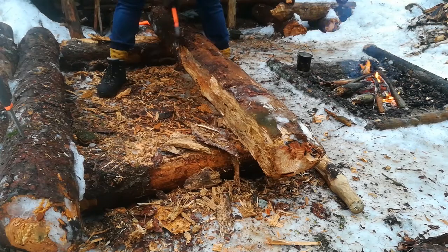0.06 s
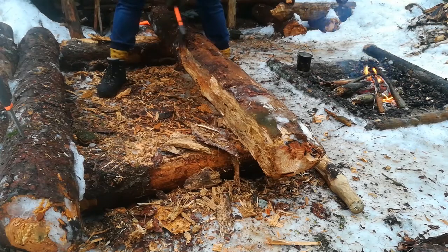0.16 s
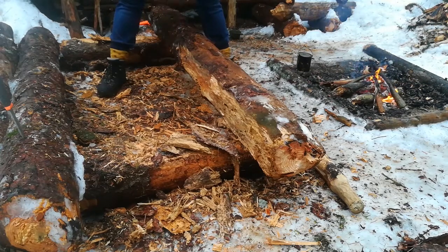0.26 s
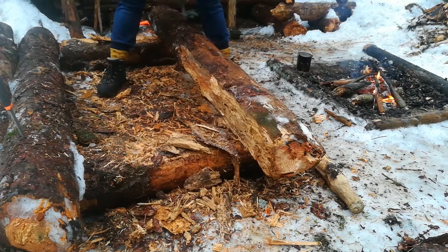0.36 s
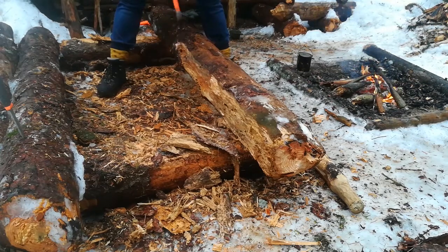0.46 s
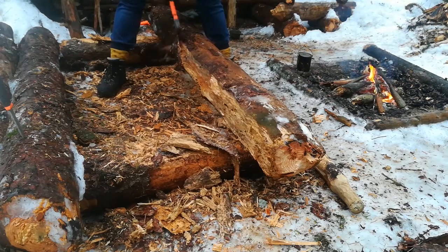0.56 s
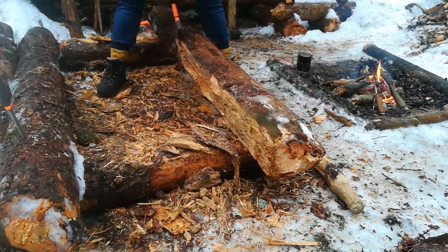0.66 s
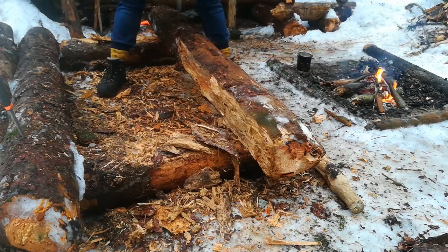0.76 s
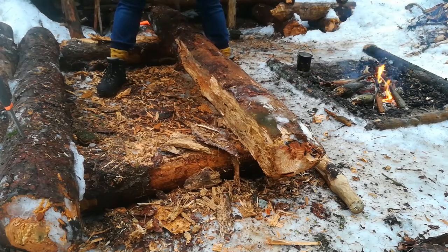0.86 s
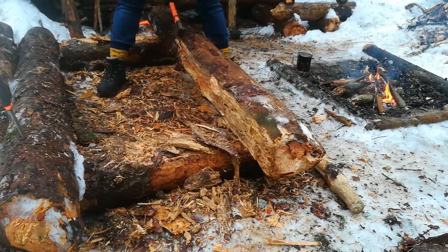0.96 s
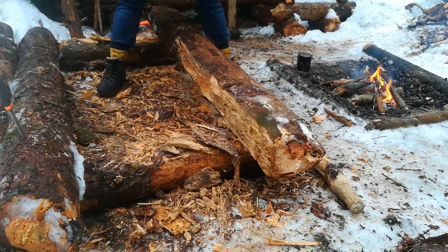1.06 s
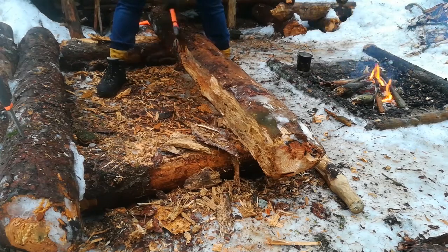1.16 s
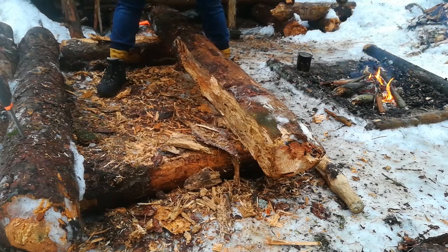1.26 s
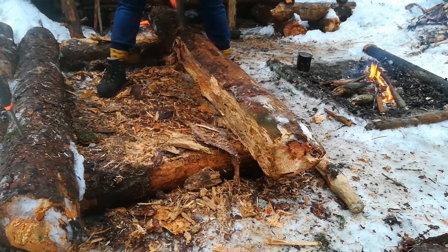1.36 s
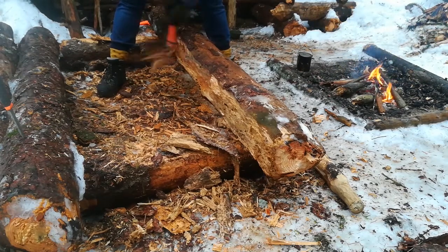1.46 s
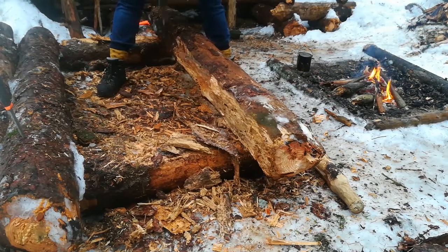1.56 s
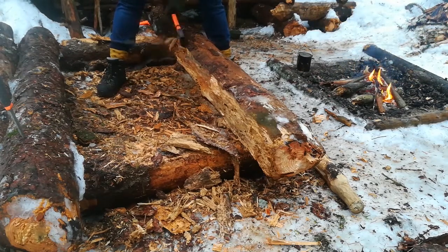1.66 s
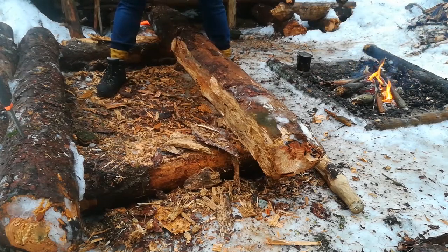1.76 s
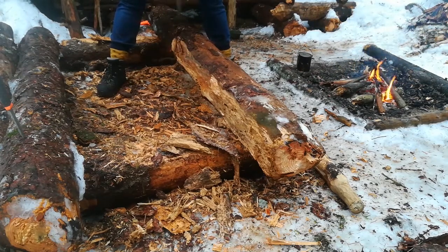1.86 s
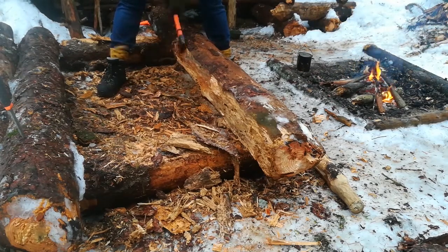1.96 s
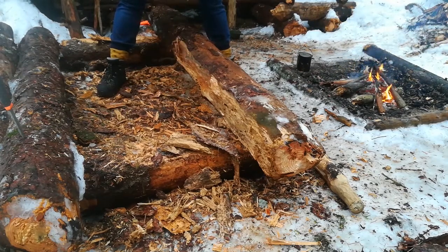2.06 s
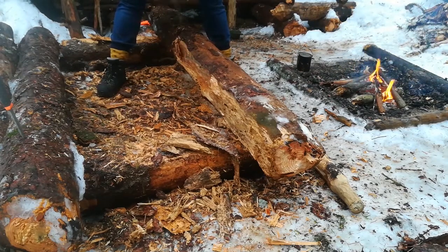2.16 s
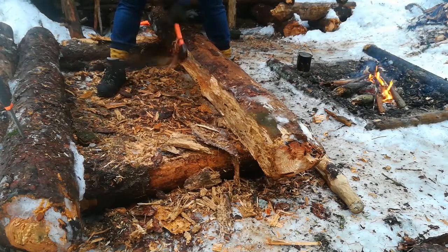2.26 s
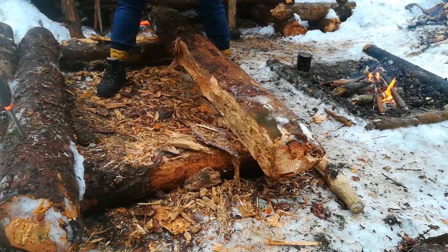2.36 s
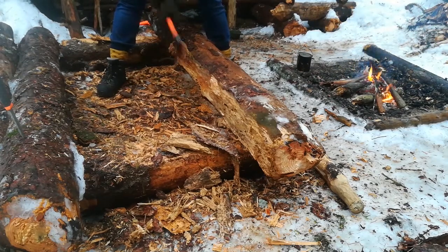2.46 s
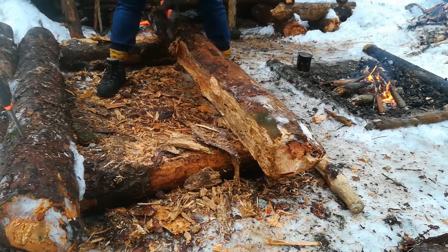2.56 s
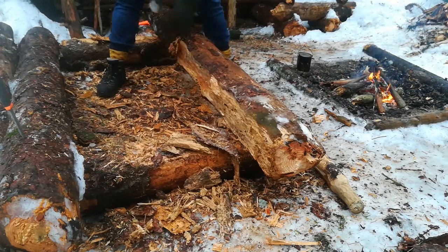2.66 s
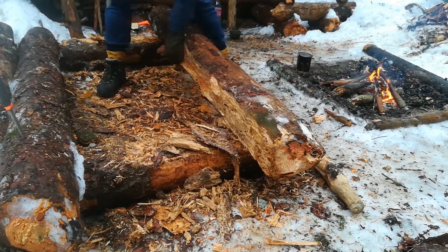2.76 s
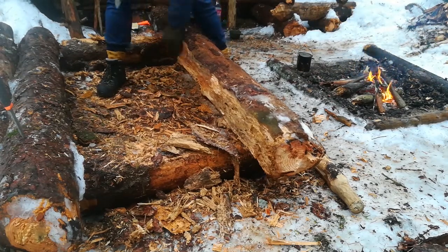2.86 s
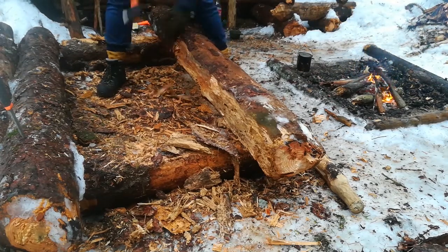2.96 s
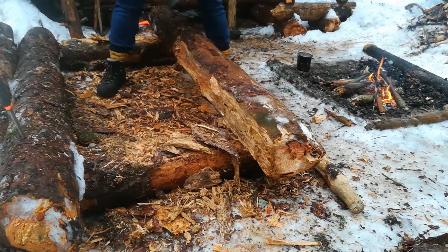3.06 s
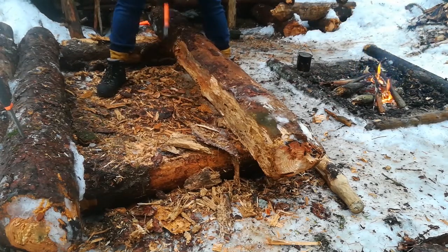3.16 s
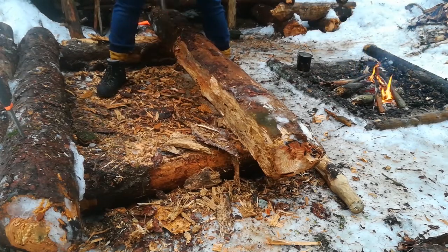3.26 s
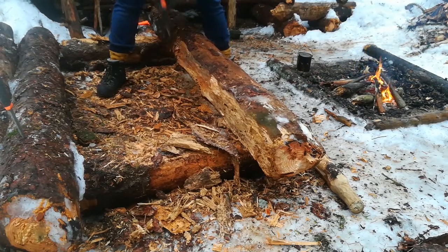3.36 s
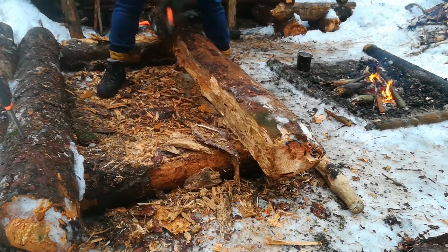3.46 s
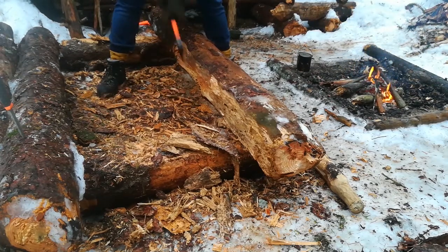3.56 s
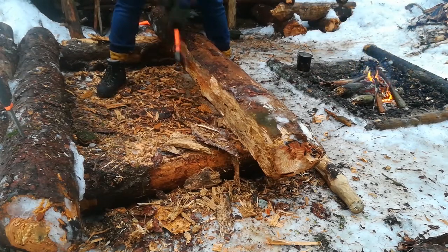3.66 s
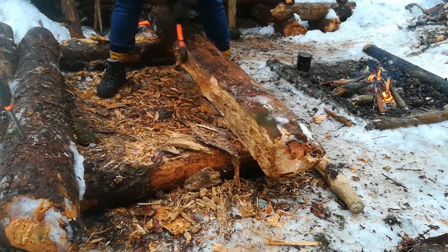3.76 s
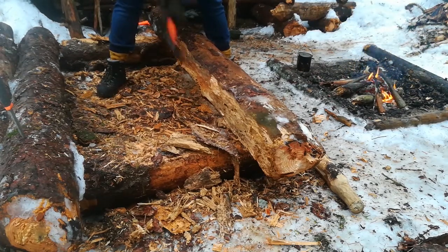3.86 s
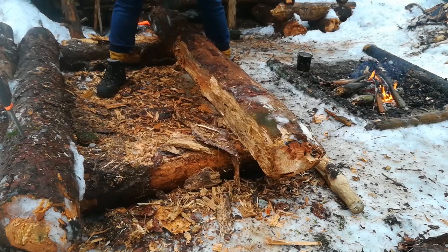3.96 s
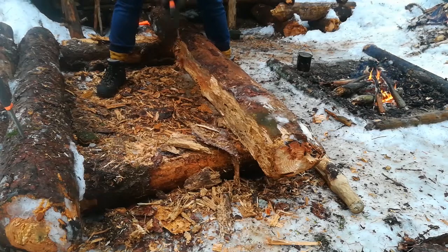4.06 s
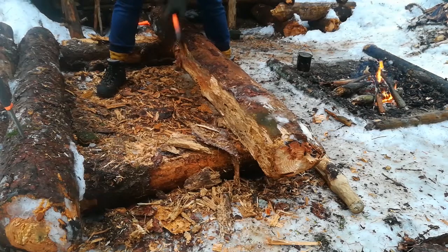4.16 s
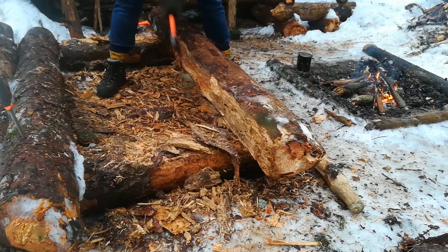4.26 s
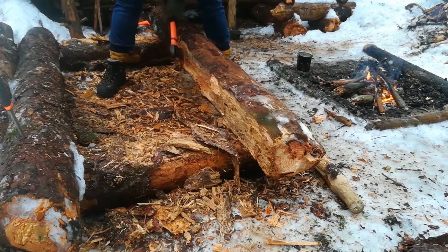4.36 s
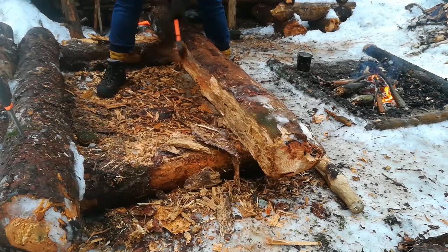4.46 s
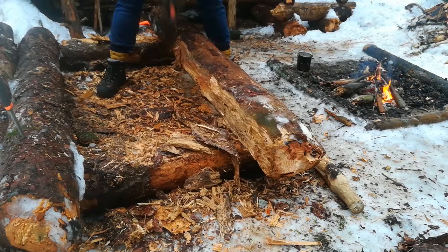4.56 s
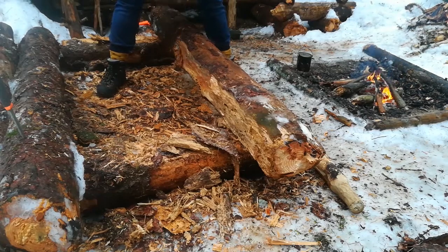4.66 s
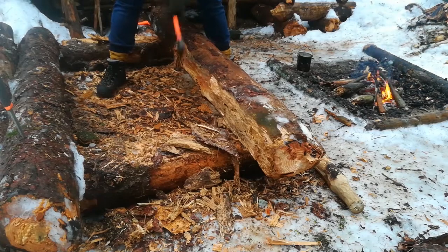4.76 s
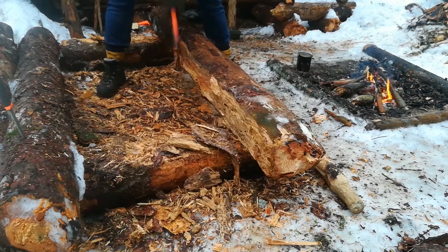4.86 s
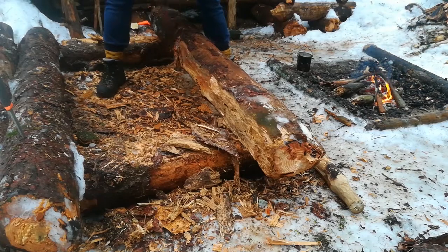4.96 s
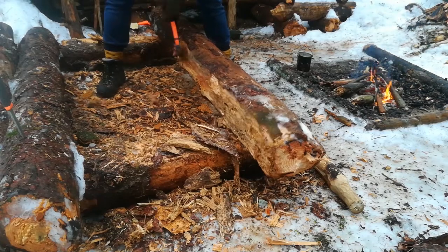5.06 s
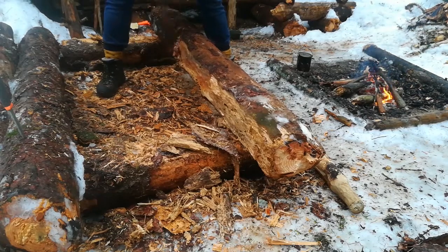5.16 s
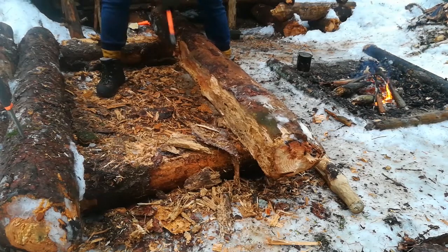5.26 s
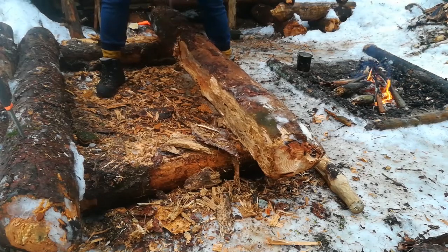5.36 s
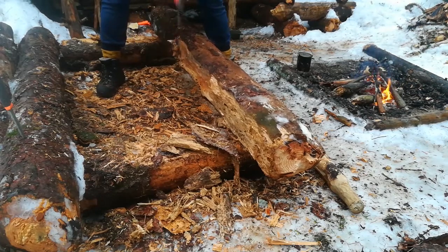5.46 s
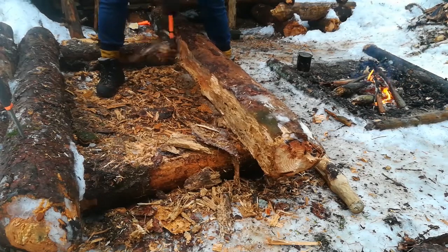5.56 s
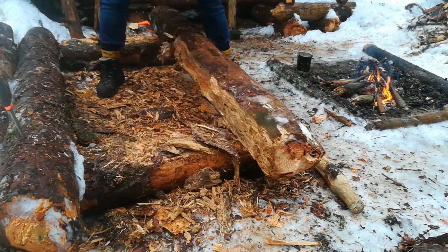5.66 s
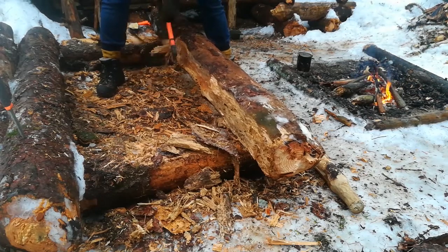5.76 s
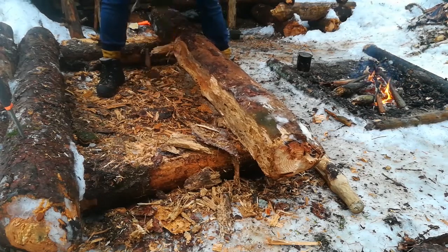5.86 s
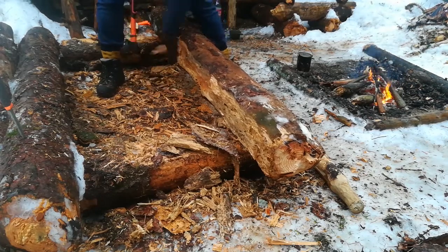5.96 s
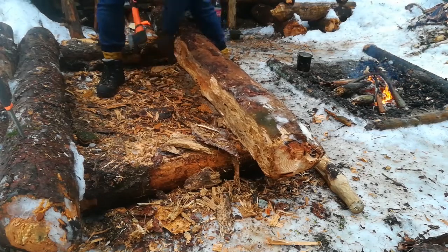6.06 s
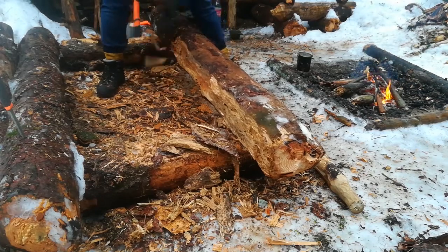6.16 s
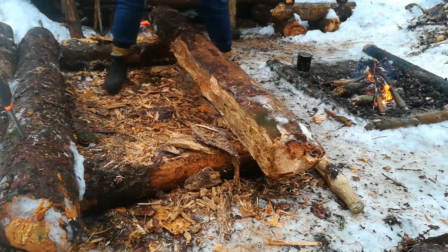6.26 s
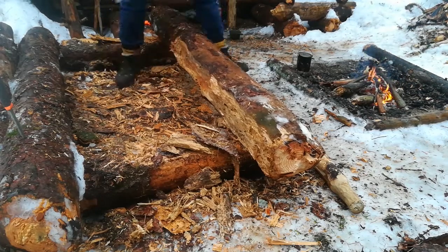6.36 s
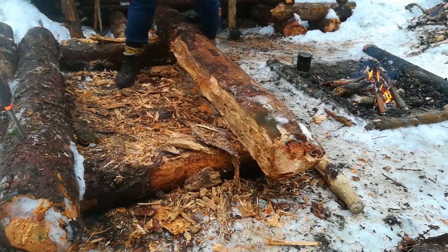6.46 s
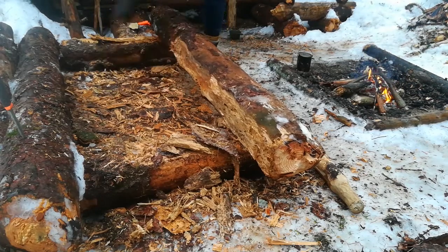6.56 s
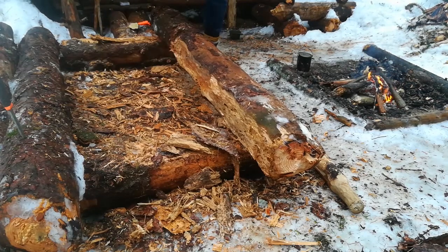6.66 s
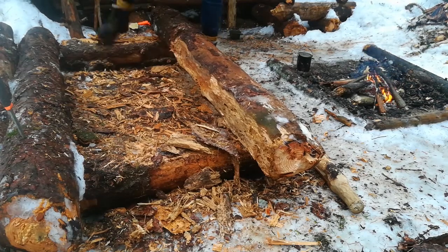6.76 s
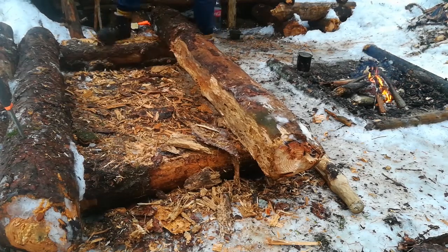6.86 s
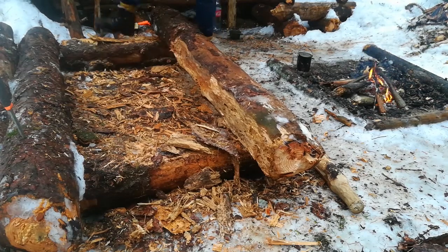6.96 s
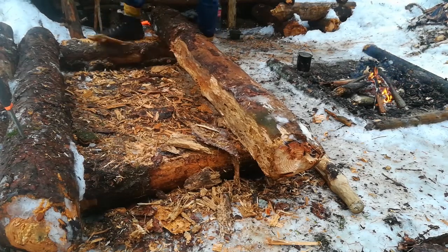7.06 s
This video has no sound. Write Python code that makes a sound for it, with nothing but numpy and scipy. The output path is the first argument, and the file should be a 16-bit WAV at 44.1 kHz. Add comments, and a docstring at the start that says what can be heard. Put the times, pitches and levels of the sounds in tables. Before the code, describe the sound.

Sharp, very short wood cracks with woody knocks, low muted thumps and bright chip spray, several blows a second. A soft burst leads to stronger chops, a brief break with bumps and scraping debris, then a long even run that gets louder. It stops abruptly, leaving faint fire-and-forest hiss, sparse ticks and a small rustle. Dry open air, fairly close stereo pickup, little deep bass.

```python
"""A snowy forest camp: an axe hews a pine log in quick bursts, a few metres from a small two-port microphone.
Each blow tears fibres in a crack of filtered noise a few ms long, knocks and thumps the log as decaying sines,
and throws chips as grainy noise. Short snaps fall within the blows and apart from them, with dull bumps and
rustles. Beneath lie a low flutter, a faint hiss of fire and forest from the left, and a few thin tones that
swell and fade."""
import sys
import numpy as np
from scipy import signal
from scipy.fft import rfft, irfft
from scipy.io import wavfile
from scipy.ndimage import uniform_filter1d

SR = 44100
rng = np.random.default_rng(int(sys.argv[2]) if len(sys.argv) > 2 else 0)


def bounce(signal):
    """Save signal as a 16-bit WAV file at the path given by the first command-line argument."""
    frames = np.transpose(np.atleast_2d(signal))
    limited = np.clip(frames, -1, 1)
    pcm = np.round(limited * 32767).astype(np.int16)
    wavfile.write(sys.argv[1], SR, pcm)


N = 313551

# Longest modes of the log, a loose cluster. Each row: pitch in Hz, level in dB, time to fall 60 dB in s.
LOG_RING = [(451.6,-2.5,0.08),(522.5,-7.5,0.045),(388.6,-7.5,0.047)]


def undb(db):
    """Decibels to gain."""
    return 10 ** (np.asarray(db) / 20)


def band(x, hz, width):
    """Two-pole resonance, gain 1 at the centre, width in Hz."""
    return signal.lfilter(*signal.iirpeak(min(hz, .45 * SR), hz / width, SR), x)


def peak(x, db):
    """Scale to a peak level in dB."""
    return x * undb(db) / np.abs(x).max()


def shape(x, points):
    """Colour the spectrum by (Hz, dB) points, joined along log frequency."""
    hz, db = np.transpose(points)
    log_hz = np.log(np.fft.rfftfreq(x.shape[-1], 1 / SR) + 1)
    return irfft(rfft(x) * undb(np.interp(log_hz, np.log(hz), db)), x.shape[-1])


def add(out, x, s):
    """Mix x into out from s seconds on."""
    i = int(s * SR)
    out[..., i:i + x.shape[-1]] += x[..., :N - i]


def grit(size, spread_db, alike):
    """Noise of uneven grains at two ports, more alike as alike nears 1."""
    mid, side = rng.standard_normal((2, size)) * undb(spread_db * rng.exponential(size=size))
    a = np.clip(alike, 0, 1)
    return np.sqrt(1 + a) * mid + np.sqrt(1 - a) * side * np.array([[1], [-1]])


def mode(t, hz, t60):
    """A struck mode: a sine that falls 60 dB in t60 seconds."""
    return np.sin(2 * np.pi * hz * t) * np.exp(-np.log(1000) * t / t60)


def push(x, ms):
    """A softer contact smears the blow over a few ms."""
    return signal.lfilter(np.hanning(int(ms * SR / 1000) + 3), 1, x)


def bright(grains):
    """Dry wood debris sounds in two humps, near 5 and 13 kHz."""
    low_hump = band(band(grains, 4730.0, 5700.0), 5000.0, 5384.0)
    high_hump = band(band(grains, 13000., 3970.0), 12800.0, 5000.0)
    return low_hump + 0.84 * high_hump


def hiss():
    """A steady hiss from the left reaches the right port later; in the treble each port hears its own."""
    # Spectrum of the hiss. Each row: frequency in Hz, relative level in dB.
    colour = [(25, -32), (160, -11.5), (280, -3.5), (450, -9), (700, -13.5), (1500, -13), (2400, -13),
              (3400, -10), (9000, -26.5), (11000, -27), (14000, -27), (15700, -31)]
    lag = 8  # samples
    common, *own = rng.standard_normal((3, N))
    common = shape(common, [(2500, 4.5), (6000, -9.0)])
    own = shape(np.array(own), [(300, -44), (1200, -2.5), (5000, 5)])
    both = shape(np.array([common, np.roll(common, lag)]) + own, colour)
    return both / both.std() * undb(-60.5)


def flutter():
    """Many weak bumps at random, softened by their contact, over a low rumble."""
    # Course of the flutter. Each row: time in seconds, rms level in dB.
    course = [(0,-61),(.5,-64),(1.05,-52),(1.6,-59),(2,-55),(2.3,-62.5),(2.85,-59),(3.15,-69),(4.1,-63),(4.9,-67.5),(5.25,-62.5),(5.8,-70),(7.11,-74.5)]
    kicks = (rng.random(N) < 110 / SR) * rng.standard_normal(N)  # about 110 a second
    rumble = band(band(rng.standard_normal(N), 62.0, 90.), 70., 120.)
    low = band(push(kicks, 2.07), 253.0, 380.0) + 4.1 * rumble
    return low / low.std() * undb(np.interp(np.arange(N) / SR, *np.transpose(course)))


def crack(t, db, hz, fade):
    """Torn fibres: a burst of grains through wood resonances, with a treble edge that grows with the crack."""
    # Resonances of the crack. Each row: centre in Hz, width in Hz, relative level in dB.
    resonances = [(3380, 140, -15), (3823, 390, -4), (4690, 890, -3), (5650, 600, -7), (7360, 1200, -5.5)]
    # Resonances of the treble edge. Each row: centre in Hz, width in Hz, relative level in dB.
    edge_bands = [(11330, 3400, 8), (13620, 1440, 5.5), (14600, 508, 0)]
    tear = grit(len(t), 3.25, 0.77) * np.minimum(t / 0.00089, 1) * np.exp(-1000 * t / max(fade, .3))
    tear[:, 30] += 4.0  # the edge bites
    body = 0.044 * band(tear, hz, 0.22 * hz)
    for f, width, level in resonances:
        # the place of the cut favours the resonances near its own colour
        favour = level - 1.1 * abs(np.log2(f / hz))
        body = body + undb(favour) * band(tear, f, width) / np.sqrt(width)
    body = band(body, 4100.0, 7100.0)
    body = body - 0.32 * band(body, 2480.0, 896.0)
    edge = sum(undb(level) * band(tear, f, width) / np.sqrt(width) for f, width, level in edge_bands)
    return peak(body, db) + peak(band(edge, 11800.0, 4550.0), -7.5 + 0.73 * db)


def knock(t, db, hz):
    """Short modes of the log, retuned a little each time, driven by the blade in a few quick pushes."""
    # Short modes of the log. Each row: pitch in Hz, level in dB, time to fall 60 dB in s.
    log_modes = [(600,-2.5,0.02),(764,-6.5,.02),(980,-1.5,0.022),(1400,-3,0.018),(1650,-3,0.017),(2100,-10,.011)]
    log = np.zeros(len(t))
    for f, level, t60 in log_modes:
        a, b = rng.standard_normal(2)
        favour = level + 1.23 * a - 10.9 * abs(np.log2(f / hz))
        log += undb(favour) * mode(t, f * (1 + b / 30), t60)
    pushes = (rng.random(400) < .03) * rng.standard_normal(400) * 0.46 * np.exp(-t[:400] / 0.0045)
    pushes[40] += 1  # the main push
    return peak(band(np.convolve(log, pushes)[:len(t)], 1300.0, 2400.0), db)


def chips(t, crack_db):
    """Falling chips: bright fading grains; harder cracks throw more."""
    grains = grit(len(t), 3.67, 0.17) * np.minimum(t / 0.0012, 1) * np.exp(-(t / 0.022) ** 0.89)
    return undb(-44 + 0.86 * crack_db) * bright(grains)


def thump(t, hz, knock_db):
    """The weight of the blow: two low modes, struck again more weakly as the log chatters on its bed."""
    low = mode(t, hz, 0.024) + 0.096 * mode(t, 196.6, 0.065)
    chatter = (rng.random(1200) < .004) * rng.standard_normal(1200) * 0.14 + (t[:1200] == 0)
    low = np.convolve(low, chatter)[:len(t)]
    return peak(band(push(low, 2.35), 309.0, 360.0), -17 + 0.57 * knock_db)


def ring(t):
    """The cluster of long modes; the grip of the bed retunes it each time and makes it waver."""
    steps = np.repeat(rng.standard_normal(len(t) // 250 + 1), 250)
    waver = undb(2.9 * uniform_filter1d(steps, size=200)[:len(t)])
    modes = np.zeros(len(t))
    for f, level, t60 in LOG_RING:
        a, b = rng.standard_normal(2)
        modes += undb(level + 2.5 * a) * mode(t, f * (1 + 0.027 * b), t60)
    return waver * modes


def rattle(t):
    """Loose bark shakes after the blow: a fading band of grains."""
    # One row: centre in Hz, width in Hz, gain in dB beside the ring, fade time constant in s.
    hz, width, db, fade = (749,699,-17.5,0.04)
    return undb(db) * band(grit(len(t), 3.4, 0.87), hz, width) * np.exp(-t / fade)


def axe():
    """Crack and knock come first with the chips; the log takes the weight once the blade has stopped."""
    # Each row: start in seconds, crack peak in dB, crack colour in Hz, knock peak in dB, knock colour in Hz,
    # thump pitch in Hz, crack fade in ms, ring gain in dB.
    blows = [(0.0729,-22,4220,-26,980,318.5,1.4,-39),(0.1927,-31.5,3280,-33,1340,356,2,-49),
             (0.3319,-28.5,3480,-26,1400,344,2.5,-38.5),(0.4449,-25,3230,-35.5,1600,227,1.6,-48),
             (0.5615,-25,6800,-29,1190,480,3.6,-49),(0.6796,-23,3800,-24,1530,404,2.03,-35.5),
             (0.807,-28,4400,-32.5,1070,480,3.8,-42),(0.967,-29,4100,-25,930,397,3.4,-32),
             (1.1687,-14.5,6500,-22.5,1780,370,1.66,-30),(1.3273,-8.5,3130,-25.5,1410,350,1.78,-35.5),
             (1.477,-15.5,5400,-24.5,1450,408,1.94,-35.5),(1.67,-16.5,3240,-23,664,417,1.94,-49),
             (1.8143,-11.5,3630,-20,1410,263,2.1,-37.5),(1.9544,-12,3650,-17,1650,362,2.1,-33.5),
             (2.1167,-16,3280,-22,915,354,2.1,-29.5),(2.266,-11,3150,-26,676,397,1.8,-29),
             (2.431,-18,3300,-25,1000,387,3.13,-38.5),(3.335,-19,3620,-31.5,1440,403,1.9,-32.5),
             (3.4565,-8.5,3470,-31.5,1400,480,1.28,-43),(3.5638,-15.5,3350,-28,1300,324,3.44,-34.5),
             (3.676,-20.5,3100,-32,1440,400,2.2,-39),(3.788,-9.5,5000,-29,1500,458,1.86,-36),
             (3.907,-8,4880,-32.5,1420,464,1.73,-42),(4.0278,-14,3140,-27.5,1660,444,2.14,-43),
             (4.137,-18,5400,-29,1440,423,3.35,-38.5),(4.2521,-19,4400,-24,970,402,3.8,-36.5),
             (4.371,-14.5,3260,-22.5,1110,496,2.44,-34),(4.4961,-16.5,3100,-20,1140,488,1.94,-30.5),
             (4.6104,-14.5,6170,-19,1110,504,2.55,-33),(4.7351,-11.5,3700,-24.5,600,493,1.77,-39),
             (4.8993,-9.5,4690,-18.5,942,463,2.26,-31),(5.0541,-5.5,4760,-20,1590,343,1.56,-30),
             (5.233,-4,4570,-23.5,975,432,1.48,-37),(5.4036,-1.5,4000,-20,1000,466,2.07,-34),
             (5.573,-4.5,4240,-19,977,454,2.16,-30),(5.7414,-2,5580,-24,1060,386,1.95,-35.5)]
    out, t = np.zeros((2, N)), np.arange(6000) / SR
    for s, db, hz, knock_db, knock_hz, thump_hz, fade, ring_db in blows:
        stopped = s + fade / 1000
        add(out, crack(t, db, hz, fade), s - .0005)
        add(out, knock(t, knock_db, knock_hz), s - .0005)
        add(out, chips(t, db), s)
        add(out, thump(t, thump_hz, knock_db), stopped + 0.00082)
        add(out, undb(ring_db) * (ring(t) * np.minimum(t / 0.0031, 1) + rattle(t)), stopped + .002)
    return out


def bumps():
    """Low pulses of about two cycles; those near the pitch of the log set it ringing."""
    # Dull bumps as the log rocks on its bed. Each row: middle in seconds, level in dB, pitch in Hz.
    rocks = [(0.274, -42.5, 277), (0.628, -45.5, 200), (0.845, -36, 203), (0.948, -41, 252),
             (1.028, -37.5, 226), (1.114, -35, 216), (1.13, -39.5, 300), (1.353, -34.5, 254),
             (1.409, -41, 117), (1.503, -31.5, 447), (1.799, -35.5, 234), (1.904, -43, 238),
             (2.557, -43.5, 190), (2.65, -37, 230), (2.657, -37, 326), (2.68, -41.5, 220),
             (2.911, -41, 240), (2.927, -28, 286), (2.944, -25.5, 277), (2.988, -40, 242), (3.75, -46, 180),
             (4.421, -41, 288), (4.786, -42.5, 233), (5.103, -35, 245), (5.121, -28, 260),
             (5.288, -39.5, 268), (7.029, -41, 596), (7.093, -39, 400)]
    out, t = np.zeros(N), np.arange(-400, 900) / SR
    for s, db, hz in rocks:
        cycles = t * hz
        pulse = np.cos(2 * np.pi * (cycles + rng.random())) * np.exp(-(cycles / 0.66) ** 2)
        add(out, undb(db) * pulse, s - 400 / SR)
        ring_db = db - 4.5 - 18.0 * abs(np.log2(hz / LOG_RING[0][0]))
        add(out, undb(ring_db) * ring(np.arange(4000) / SR), s)
    return out


def snaps():
    """Short broad clicks of fading grains; high ones die sooner."""
    # Short snaps of fibre, some just before or inside a blow as extra tears, others apart; and fire pops.
    # Each row: start in seconds, peak in dB, colour in Hz.
    clicks = [(1.475,-15.5,2980),(1.499,-30.5,4500),(1.51,-36,4500),(1.549,-38.5,5000),(1.724,-41,12000),(1.78,-24.5,14500),(2.1494,-26.5,14400),(2.2705,-11,3700),(2.3433,-26.5,14600),(2.427,-16,3100),(2.799,-41,5850),(2.8223,-38.5,5800),(2.942,-40.5,4970),(3.342,-29,4970),(3.5732,-28,2950),(4.56,-31,14500),(5.025,-27,14500),(5.052,-20,4700),(5.5755,-5.5,3700),(5.753,-11.5,5570),(5.771,-30,3980),(5.799,-42,6000),(5.981,-30.5,6100),(6.1,-45,9000),(6.447,-45,7000),(6.643,-45.5,9000),(6.8576,-39,6260),(6.922,-41,3400),(6.925,-40,1400)]
    out, t = np.zeros((2, N)), np.arange(600) / SR
    for s, db, hz in clicks:
        click = grit(len(t), 3.0, 0.53) * np.exp(-t * (hz + 2000.0) / 9.5)
        add(out, peak(band(click, hz, 0.29 * hz) + 0.12 * bright(click), db), s - .0003)
    return out


def rustle():
    """Short swells of dense dry grains, bright and wide, gathered in clumps."""
    # Chips and bark sliding under hand and boot.
    # Each row: middle in seconds, level in dB, half-length of the swell (to 1/e) in ms, colour in Hz.
    slides = [(1.51,-53,34,4500),(2.712,-54.5,14,8500),(2.778,-51.5,18,6500),(2.894,-52,14.4,8500),(2.999,-57,10,8500),(5.947,-55,9.4,8500),(5.974,-49,18,6500),(6.115,-56,25,9300),(6.91,-60.5,14,8400),(7.089,-49.5,16,5540)]
    t, out = np.arange(-2500, 2500) / SR, np.zeros((2, N))
    for s, db, ms, hz in slides:
        clumps = uniform_filter1d(np.repeat(rng.standard_normal(len(t) // 100), 100), size=60)
        grains = grit(len(t), 2.2, 0.36) * undb(3.7 * clumps)
        grains = bright(grains) + 2.3 * band(band(grains, hz, 1.7 * hz), hz, 1.6 * hz)
        swell = np.exp(-(1000 * t / ms) ** 2)
        add(out, undb(db) * swell * grains / grains.std(), s + t[0])
    return out


def whistle():
    """Faint narrow wavering tones from noise in tight bands, perhaps wet wood whistling in the fire."""
    # Each row: middle in seconds, half-length of the swell (to 1/e) in seconds, pitch in Hz, level in dB.
    tones = [(4.13,.22,404,-66),(4.85,.2,404,-71),(5.33,.13,1513,-75)]
    out, t = np.zeros(N), np.arange(N) / SR
    for s, length, hz, db in tones:
        tone = band(band(rng.standard_normal(N), hz, hz / 40), hz, hz / 40)
        out += undb(db) * np.exp(-((t - s) / length) ** 2) * tone / tone.std()
    return out


def scene():
    """The two ports hear the blows and snaps with different colour, and a little of the low sounds apart."""
    # Bands that lean left, or right if negative. Each row: centre in Hz, width in Hz, share as a gain.
    lean = [(1346, 240, 0.15), (2740, 940, 0.73), (6500, 2000, -0.24), (10060, 1930, 0.89)]
    hits, low = axe() + snaps(), bumps() + flutter()
    side = sum(share * band(hits.mean(axis=0), f, width) for f, width, share in lean)
    side = side + .07 * np.roll(low, 400)  # 400 samples late
    return hits + low + side * np.array([[1], [-1]]) + rustle() + hiss() + whistle()


def record(dry):
    """The small microphone loses the deepest bass; the recorder rounds the loudest peaks and cuts the top."""
    top_hz = 16300
    thin = signal.lfilter(*signal.butter(2, 45., "high", fs=SR), dry)
    rounded = thin / (1 + (thin / .8) ** 4) ** .25
    return signal.sosfilt(signal.ellip(8, .2, 70, top_hz, fs=SR, output="sos"), rounded)


dry = scene()
out = record(dry)
bounce(out)
```